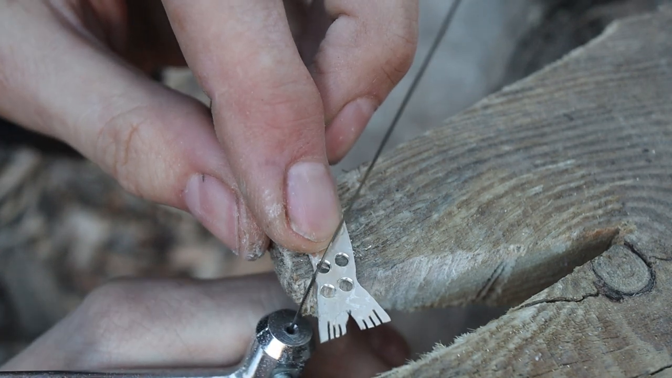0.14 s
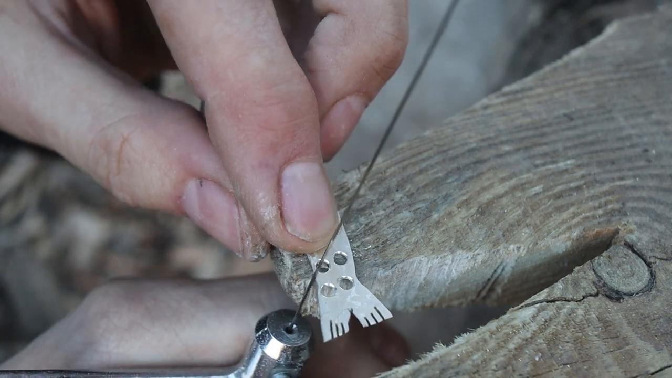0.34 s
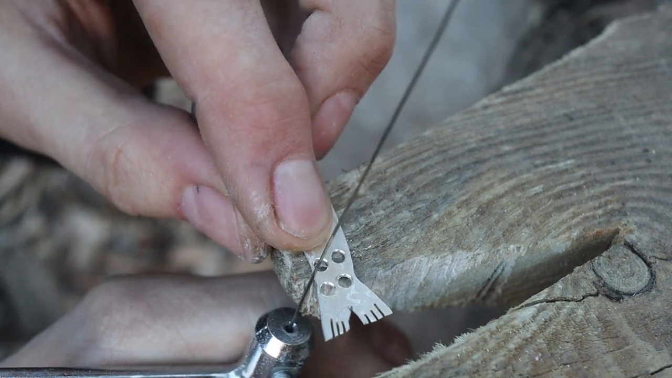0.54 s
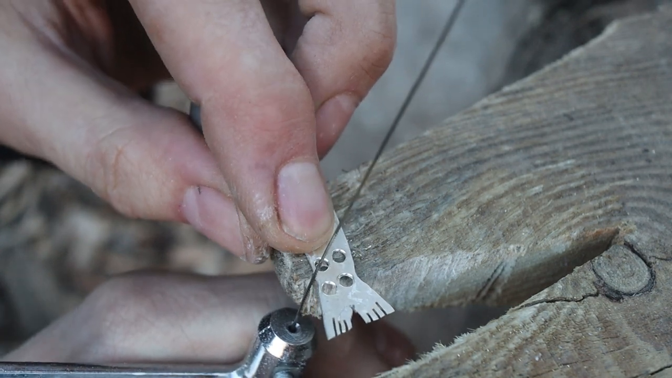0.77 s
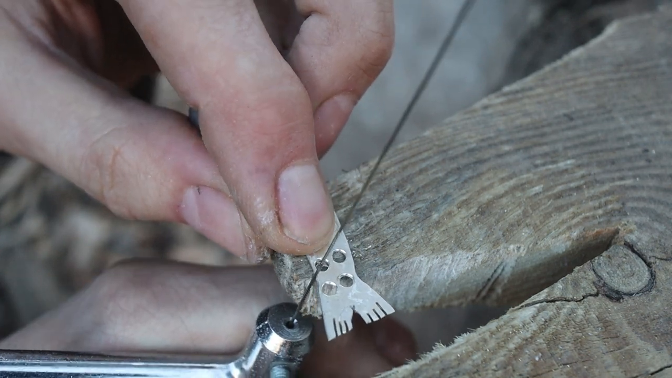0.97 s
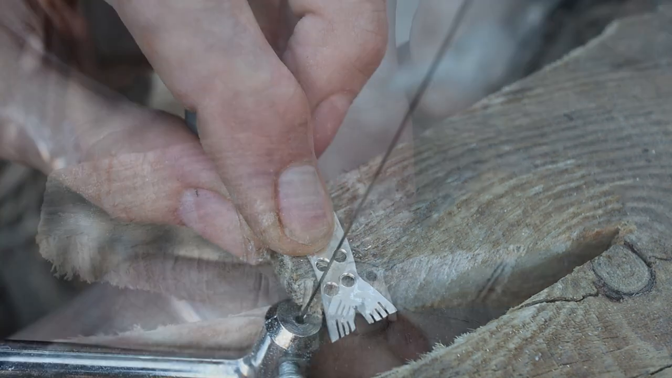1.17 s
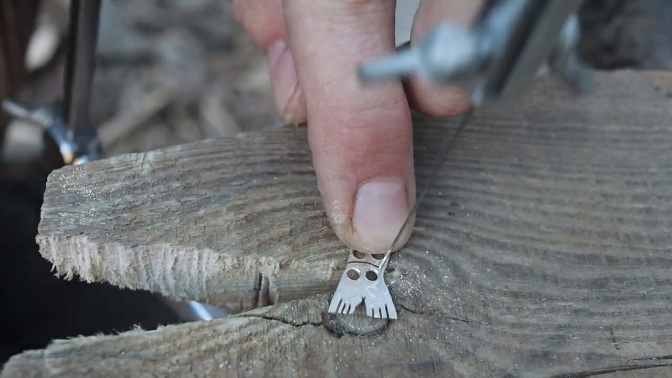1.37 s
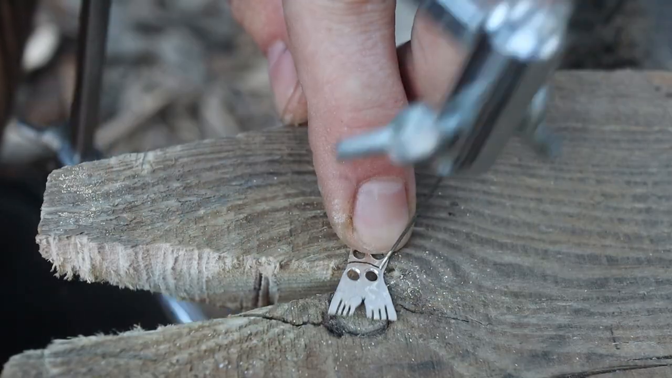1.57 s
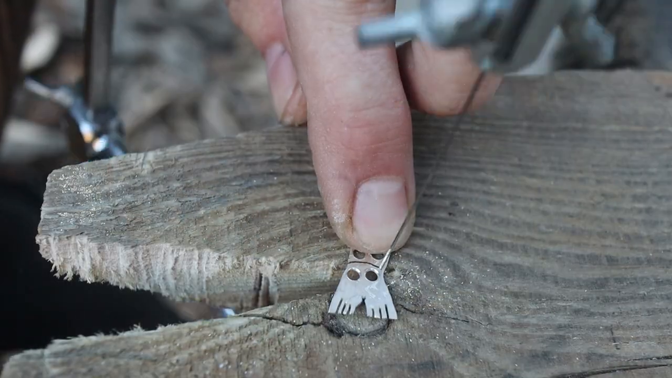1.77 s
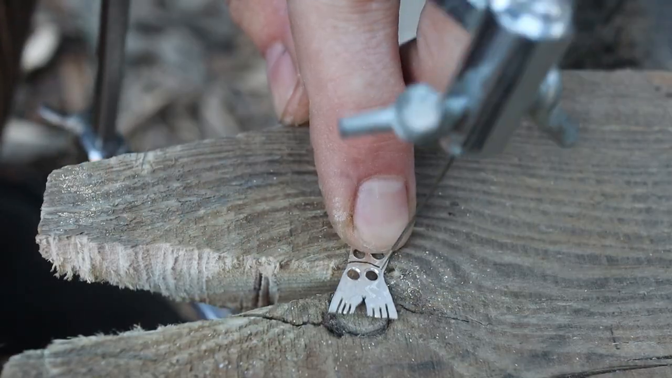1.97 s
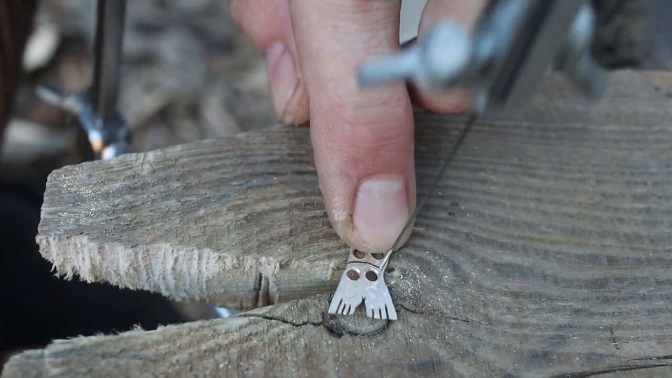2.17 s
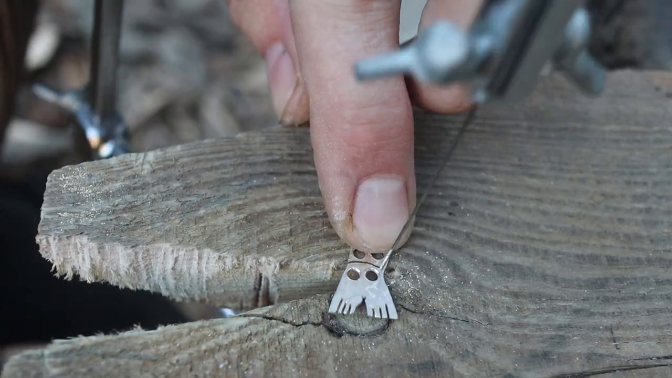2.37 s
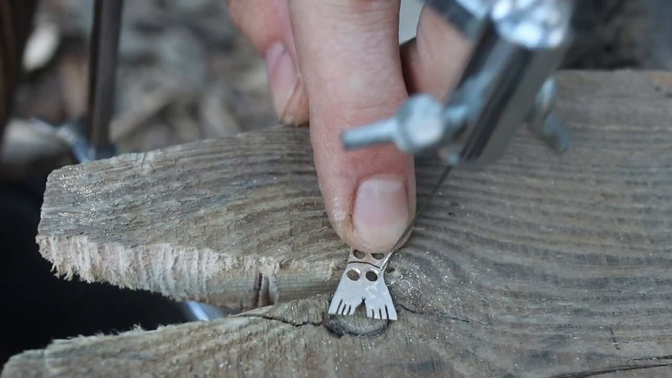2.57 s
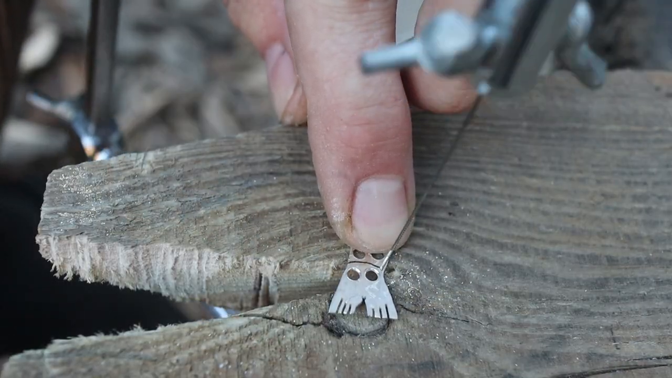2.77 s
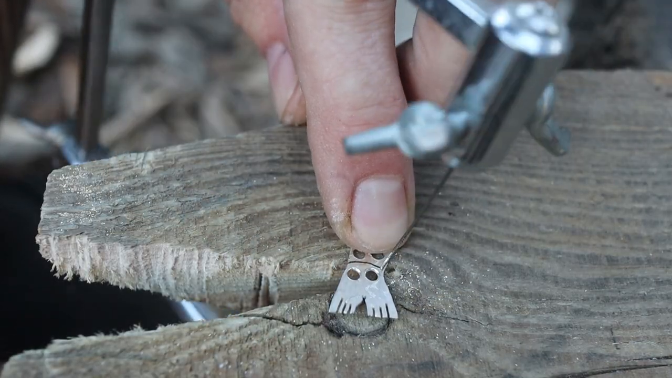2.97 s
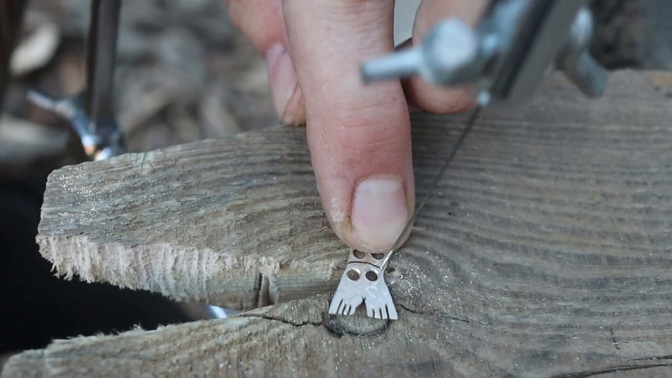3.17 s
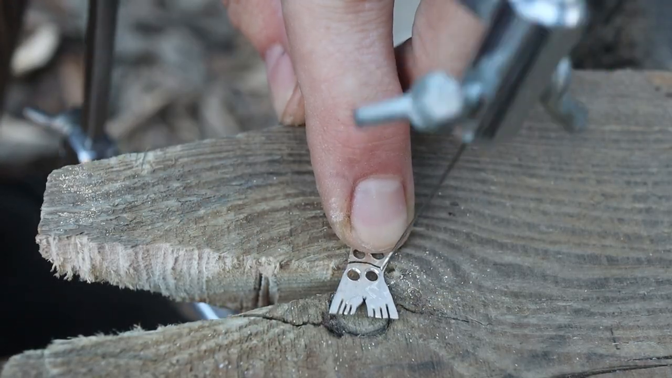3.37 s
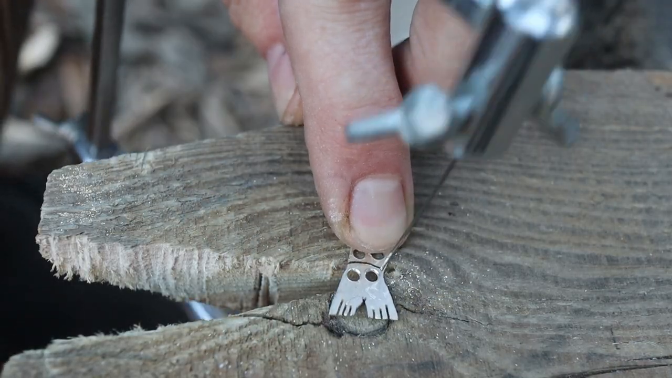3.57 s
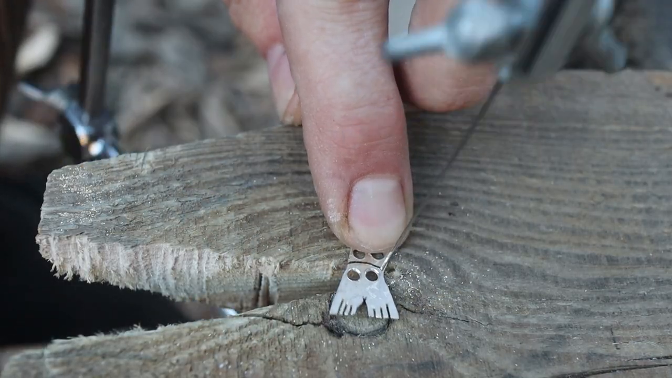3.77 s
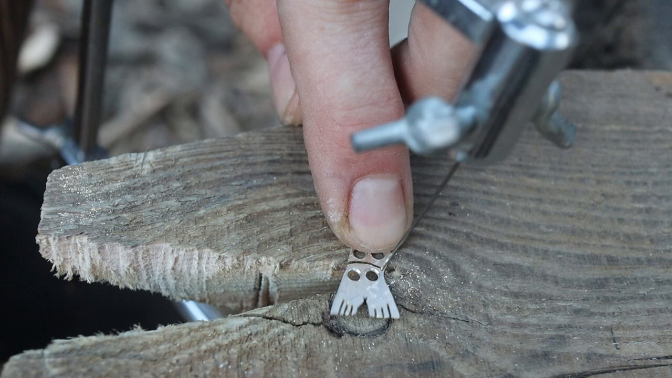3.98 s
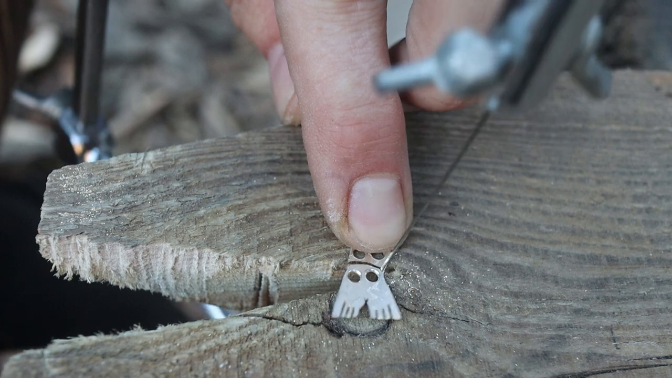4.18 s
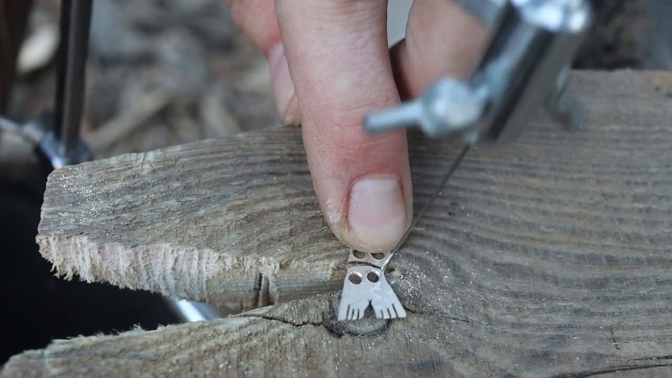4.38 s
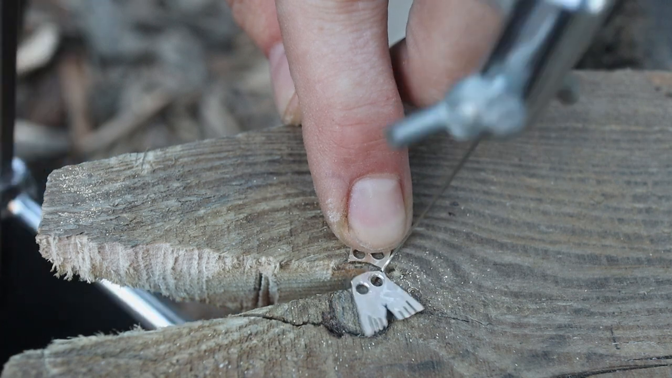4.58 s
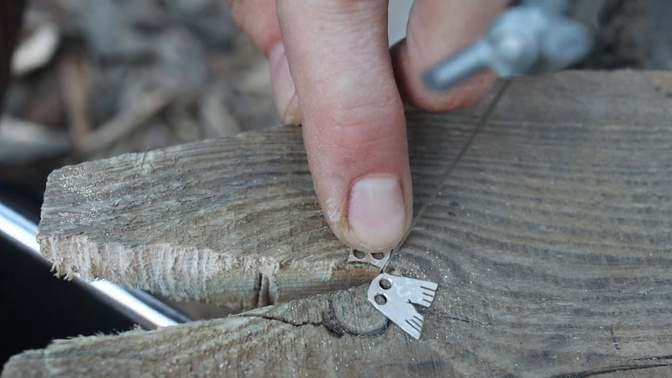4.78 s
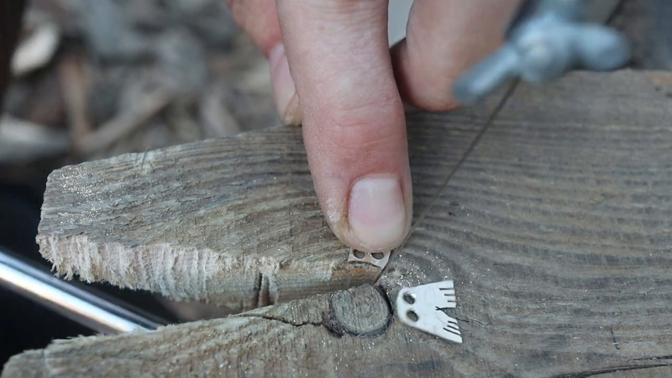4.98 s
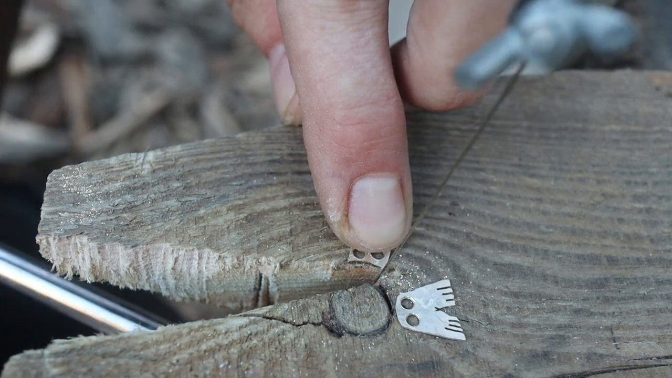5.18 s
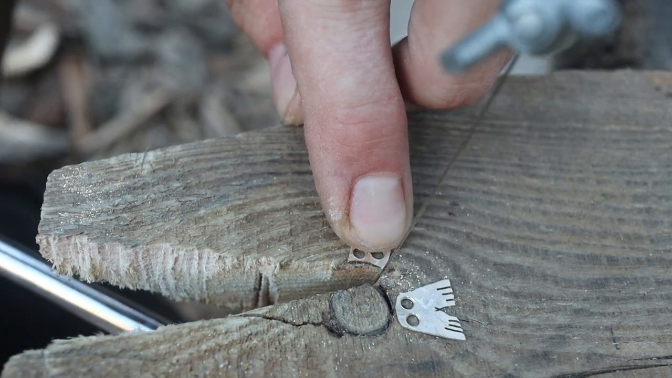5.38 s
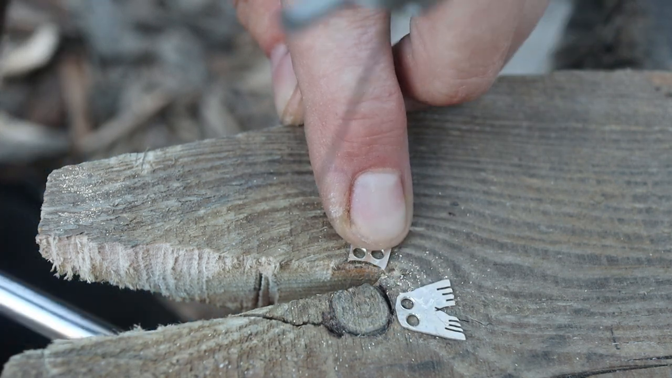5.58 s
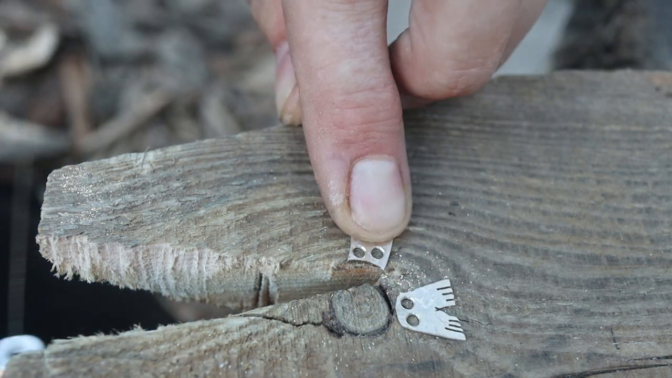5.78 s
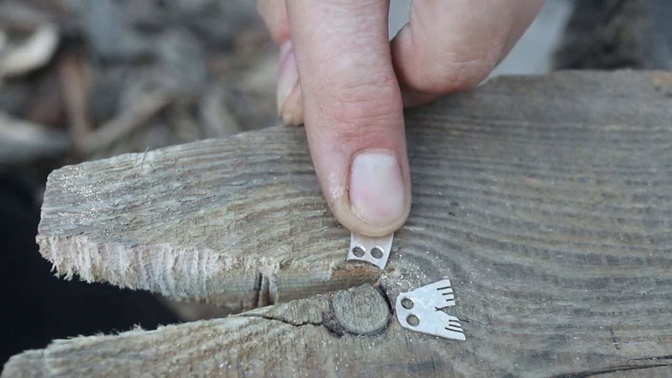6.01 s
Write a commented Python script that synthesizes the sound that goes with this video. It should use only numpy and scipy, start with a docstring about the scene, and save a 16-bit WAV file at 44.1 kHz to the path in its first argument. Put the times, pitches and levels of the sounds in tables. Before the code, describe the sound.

Outdoors, after a rattle of catches, a fine saw rasps rapidly through thin metal; a small piece snaps off tinkling and the frame clinks.

```python
"""Jeweller's saw on a bench peg

A jeweller's saw cuts thin sheet metal on a wooden bench peg, outdoors, about eight strokes a second.
Teeth tick unevenly and chips grind, exciting resonances of blade, sheet and peg; the blade snags and knocks.
The piece breaks off and tinkles, and the frame clinks as it is drawn out: taps excite decaying modes.
Behind lie shaped noise, as outdoor rumble and hiss, and a few far-off calls made of three harmonics.
"""
import sys
import numpy as np
from scipy import signal
from scipy.fft import rfft, irfft
from scipy.io import wavfile
from scipy.ndimage import uniform_filter1d, map_coordinates

SR = 44100
rng = np.random.default_rng(int(sys.argv[2]) if len(sys.argv) > 2 else 0)


def generate_wav(signal):
    """Clip the signal to [-1, 1] and save it as 16-bit WAV at the path in sys.argv[1]."""
    frames = np.transpose(np.atleast_2d(signal))
    scaled = np.clip(frames, -1, 1) * 32767
    pcm = np.round(scaled).astype(np.int16)
    wavfile.write(sys.argv[1], SR, pcm)


N = 266584
TIME = np.arange(N) / SR


def undb(db):
    """Amplitude ratio: every 20 dB is a factor of ten."""
    return 10 ** (np.asarray(db) / 20)


def rms(x):
    """Root mean square: the steady amplitude of equal power."""
    return np.sqrt(np.mean(x ** 2)) + 1e-12


def add(out, start_s, x):
    """Superposition: mix x into out from start_s, cut at the end of out."""
    i = int(start_s * SR)
    out[i:i + len(x)] += x[:len(out) - i]


def walk(rate_hz, size):
    """Band-limited randomness: smoothed random steps with a spread near 1."""
    k = max(int(SR / rate_hz), 1)
    steps = np.repeat(rng.standard_normal(size // k + 2), k)
    return uniform_filter1d(steps, k)[:size] * np.sqrt(3 / 2)


def body(peaks, base_db, base_tilt_db, low_hz, size=8192):
    """Minimum-phase resonator: peaks over a sloping base; a small object radiates little bass."""
    f = np.arange(size // 2 + 1) * SR / size + 1
    # the base bends near 3 kHz and then slopes by base_tilt_db per octave
    power = undb(base_db + base_tilt_db * np.log2(np.hypot(1, f / 3000))) ** 2
    for hz, width_hz, db in peaks:
        detuning = (f / hz - hz / f) * hz / width_hz
        power = power + undb(db) ** 2 / (1 + detuning ** 2)
    power = power / (1 + (low_hz / f) ** 8) + 1e-9
    # folding the cepstrum onto positive time makes the response causal
    cepstrum = irfft(np.log(power) / 2)
    cepstrum[1:size // 2] *= 2
    cepstrum[size // 2 + 1:] = 0
    return irfft(np.exp(rfft(cepstrum)))


PEG_TOP_HZ, HISS_FROM_HZ = 800, 4200


def voice(x, levels_db, seconds):
    """Band energy: set the peg (low), blade (middle) and hiss (top) levels over the given time."""
    bands = [(PEG_TOP_HZ, "low"), ([PEG_TOP_HZ, HISS_FROM_HZ], "band"), (HISS_FROM_HZ, "high")]
    total = 0
    for (hz, kind), db in zip(bands, levels_db):
        part = signal.sosfiltfilt(signal.butter(4, hz, kind, fs=SR, output="sos"), x)
        total = total + part * undb(db) / rms(part)
    # x may outlast the stroke: keep the energy of the stroke's own length
    return total * np.sqrt(seconds * SR / len(x))


def ring(modes):
    """Free vibration: one second of exponentially decaying modes after a tap."""
    t = TIME[:SR]
    return sum(undb(db - 60 * t / t60) * np.sin(2 * np.pi * hz * t) for hz, db, t60 in modes)


def contact(scrape_s, scrape, size=600):
    """Impulsive contact: a hard tap followed by decaying scrape noise."""
    force = scrape * rng.standard_normal(size) * np.exp(-TIME[:size] / scrape_s)
    force[0] += 1
    return force


# outdoor background spectrum, relative level per hertz: pitch_hz, level_db
AIR_SPECTRUM = [(15, -36), (25, -3.5), (70, 2.5), (120, 0.5), (242, -6), (463, -15), (796, -14.5),
                (1790, -24.5), (2000, -25), (2220, -27.5), (3820, -31.5), (4250, -30.5), (7110, -33),
                (14800, -36.5), (16000, -44)]
# levels at the start, which slowly fade
AIR_HISS_DB, AIR_RUMBLE_DB, AIR_FADE_DB_PER_S = -40.5, -40, 0.54
# the background dips while the sawing is steady
DIP_FROM_S, DIP_UNTIL_S = 1.399, 4.45
DIP_FALL_S, HISS_RECOVERY_S, RUMBLE_RECOVERY_S = 0.15, 0.033, 0.21
# initial depth, and the fraction of it lost each second
DIP_HISS_DB, DIP_RUMBLE_DB, DIP_EASE_PER_S = -17, -32.5, 0.097


def outdoors(gust_db, rumble_below_hz):
    """Spectrally shaped noise: distant hiss over an unevenly swelling rumble; both dip and return."""
    f = np.arange(N // 2 + 1) * SR / N + 1
    hz, db = np.transpose(AIR_SPECTRUM)
    spectrum = rfft(rng.standard_normal(N)) * undb(np.interp(np.log(f), np.log(hz), db))
    spectrum = spectrum / rms(irfft(spectrum, N))
    low = 1 / (1 + (f / rumble_below_hz) ** 2)
    dip = np.clip((TIME - DIP_FROM_S) / DIP_FALL_S, 0, 1)
    dip = dip * (1 - DIP_EASE_PER_S * (TIME - DIP_FROM_S))
    since = np.maximum(TIME - DIP_UNTIL_S, 0)
    hiss_db = AIR_HISS_DB + DIP_HISS_DB * dip * np.exp(-since / HISS_RECOVERY_S)
    rumble_db = AIR_RUMBLE_DB + DIP_RUMBLE_DB * dip * np.exp(-since / RUMBLE_RECOVERY_S)
    rumble = irfft(spectrum * low, N) * undb(rumble_db + gust_db * walk(12, N))
    hiss = irfft(spectrum * (1 - low), N) * undb(hiss_db)
    return (rumble + hiss) * undb(-AIR_FADE_DB_PER_S * TIME)


# resonances of the taut blade when struck: pitch_hz, width_hz, level_db
CATCH_PEAKS = [(431, 21.4, 18.5), (1170, 200, -11), (1800, 37, -9), (2140, 120, -6), (2668, 12, 6.5),
               (2690, 120, -5), (3040, 60, -2), (3395, 185, 0), (4590, 76, 2.5), (5360, 43, -3),
               (6300, 470, -1.5), (7740, 23, 4.5), (8500, 510, -7), (9330, 1200, -7.5), (12100, 110, -27)]
# single catches and knocks of the blade, levels relative, times before a common offset:
# time_s, peak_db, peg_share_db, hiss_share_db
BLADE_KNOCKS = [(0.002, -15, -16, -6), (0.093, -20, -36, -25), (0.209, -30.5, -7, -33),
                (0.232, -13, -13, -29), (1.143, -3.5, -10, -2.5), (1.156, -3.5, -8.5, -14),
                (1.171, -4, -30, -14), (1.179, -2.5, -17, -7), (1.218, -12, -10, -12.5),
                (1.407, -19.5, -15, -14), (1.43, -24, -24, 2), (4.491, -19.5, -16, -6),
                (4.736, -14, -2, -18), (4.865, -28.5, -1, -16), (4.901, -11, 0, -15),
                (4.927, -0.5, -24, -5), (5.009, -16, -5, -19), (5.021, -11, -35, -3),
                (5.123, -23.5, -15, -6), (5.144, -32, -16, -18)]


def knocks(blade_db, gain_db, offset_s, top_hz):
    """Impulse response: the blade catches or knocks, and each short tap jolts blade and peg."""
    out = np.zeros(N)
    response = body(CATCH_PEAKS, base_db=-24, base_tilt_db=-6, low_hz=340)
    response = signal.sosfilt(signal.butter(6, top_hz, fs=SR, output="sos"), response)
    for time_s, db, peg_db, hiss_db in BLADE_KNOCKS:
        jolt = signal.fftconvolve(contact(scrape_s=.003, scrape=.4), response)
        jolt = voice(jolt, (peg_db, blade_db, hiss_db), 1)
        add(out, time_s + offset_s, jolt * undb(db + gain_db) / np.abs(jolt).max())
    return out


def sawing(strokes, peaks, base_db, base_tilt_db, low_hz, tooth_hz, jitter, scatter_db, judder_hz,
           judder_db, grit, swell, hiss_swell, vary_db, detune, flex, gain_db):
    """Stick-slip excitation: each stroke speeds up and slows down; teeth tick and chips grind."""
    out = np.zeros(N)
    for start_s, end_s, fullest, *levels_db in strokes:
        n = int((end_s - start_s) * SR)
        u = np.linspace(0, 1, n)
        speed = np.abs(np.sin(np.pi * u))
        teeth = np.cumsum(tooth_hz * speed * (1 + jitter * walk(900, n))) / SR
        ticks = np.diff(np.floor(teeth), prepend=0) * undb(scatter_db * rng.standard_normal(n))
        # the hand presses hardest at the fullest moment, and the blade sticks and slips
        bend = np.log(.5) / np.log(fullest)
        push = np.abs(np.sin(np.pi * u ** bend))
        force = ticks / rms(ticks) + grit * rng.standard_normal(n)
        force = force * push ** swell * undb(judder_db * walk(judder_hz, n))
        # light contact is dull: the sharp edge of each tick comes only with pressure
        dull = signal.sosfiltfilt(signal.butter(2, HISS_FROM_HZ, fs=SR, output="sos"), force)
        force = dull + (force - dull) * push ** hiss_swell
        # the blade sits a little differently in the cut every time
        seat = rng.standard_normal((len(peaks), 2))
        seated = [(hz + detune * width_hz * a, width_hz, db + vary_db * b)
                  for (hz, width_hz, db), (a, b) in zip(peaks, seat)]
        sound = signal.fftconvolve(force, body(seated, base_db, base_tilt_db, low_hz))
        # the blade flexes, so its resonances waver
        stretch = 1 + flex * walk(37.0, len(sound))
        sound = map_coordinates(sound, [np.cumsum(stretch)], order=3)
        add(out, start_s, voice(sound, levels_db, end_s - start_s))
    return out * undb(gain_db)


# light scrapes while the blade is placed, levels relative:
# start_s, length_s, blade_db, hiss_share_db
LIGHT_SCRAPES = [(0.09, 0.089, -49.5, -24), (0.24, 0.05, -45.5, -21), (1.246, 0.079, -46, -6.5),
                 (1.309, 0.065, -51, -3.5), (1.397, 0.085, -46.5, -8.5)]
SCRAPE_PEG_DB = -1.5  # relative to the blade
# cutting strokes of the steady sawing, each followed by a lighter return:
# loudest_s, effort_db, bite_db (extra hiss as the teeth bite)
CUT_STROKES = [(1.539, -2.5, -0.5), (1.663, -0.6, 5), (1.783, -1.2, 4.5), (1.908, -0.2, 6),
               (2.033, -4.5, 6), (2.164, -0.2, 0), (2.285, 2.2, 1.5), (2.402, -1, 9.5), (2.535, -1.7, 3),
               (2.661, -1.9, 2), (2.782, -2.1, 4), (2.917, -1.5, -0.5), (3.043, -2, -1), (3.168, 0.4, -1.5),
               (3.292, 1.5, -2), (3.417, 0, -1), (3.543, -1, -5), (3.669, 0.6, -2.5), (3.795, 1.5, -0.5),
               (3.920, 1.5, -0.5), (4.049, 1.4, -1.5), (4.166, 2, -2.5), (4.289, 1.5, 6), (4.42, 1, 1)]
# relative levels at average effort, and their growth with it: peg_db, blade_db, hiss_db
CUT_LEVELS = (-45.5, -43.5, -54.5)
RETURN_LEVELS = (-53, -47.5, -59)
# growth in dB per dB of effort: peg, blade, hiss
EFFORT_GROWTH = (1.1, 0.91, 1.57)
# the return drags more as the slot deepens
DRAG_DB_PER_S = 0.2
# every cut lasts alike; the return begins as it dies away and ends with a pause before the next cut
CUT_S, OVERLAP_S, PAUSE_S = 0.058, 0.005, 0.003
# fullest moment as a fraction of the stroke
CUT_FULLEST, RETURN_FULLEST, SCRAPE_FULLEST = 0.53, 0.39, 0.2


def free_strokes():
    """Reciprocating motion: cut and return alternate with the hand's effort; light scrapes are added."""
    strokes = []
    next_starts = [loudest_s - CUT_S * CUT_FULLEST for loudest_s, _, _ in CUT_STROKES[1:]]
    next_starts.append(BINDING_STROKES[1][0])
    halfway_s = (CUT_STROKES[0][0] + CUT_STROKES[-1][0]) / 2
    for (loudest_s, effort_db, bite_db), next_start in zip(CUT_STROKES, next_starts):
        turn = loudest_s + CUT_S * (1 - CUT_FULLEST)
        effort = effort_db * np.array(EFFORT_GROWTH)
        peg_db, blade_db, hiss_db = effort + CUT_LEVELS
        strokes.append((turn - CUT_S, turn, CUT_FULLEST, peg_db, blade_db, hiss_db + bite_db))
        return_db = effort + RETURN_LEVELS + DRAG_DB_PER_S * (loudest_s - halfway_s)
        strokes.append((turn - OVERLAP_S, next_start - PAUSE_S, RETURN_FULLEST, *return_db))
    for start_s, length_s, db, hiss_db in LIGHT_SCRAPES:
        strokes.append((start_s, start_s + length_s, SCRAPE_FULLEST, db + SCRAPE_PEG_DB, db, db + hiss_db))
    return strokes


# resonances of blade, sheet and peg, running free: pitch_hz, width_hz, level_db
FREE_PEAKS = [(345, 23, -11.5), (440.4, 25.3, -0.5), (508, 40, -14), (703, 31, -12.5), (1005, 43, -12.5),
              (1297, 32, -14), (1462, 7.4, -7.5), (1644, 76, -14.5), (1967, 50, -4), (2696, 30.6, -3.5),
              (2817, 50, -5.5), (2930, 88, -4.5), (3319, 27, -2.5), (3200, 37, -6.5), (3935, 33, -10),
              (4750, 190, -18.5), (5450, 29, -18.5), (6250, 53, -21), (7000, 300, -19), (7920, 150, -25.5),
              (8590, 45, -12), (9950, 310, -26.5), (11600, 340, -34), (12600, 59, -36), (13600, 400, -32),
              (14800, 300, -47)]


def free_sawing():
    """Forced vibration: the freely running blade excites blade, sheet and peg resonances."""
    return sawing(free_strokes(), FREE_PEAKS, base_db=-23.5, base_tilt_db=-16.0, low_hz=292,
                  tooth_hz=515.4, jitter=.09, scatter_db=3.5, judder_hz=308.0, judder_db=1.0,
                  grit=1.0, swell=.8, hiss_swell=0.58, vary_db=2.5, detune=1.0, flex=0.0079,
                  gain_db=-0.71)


# far-off calls: start_s, length_s, pitch_hz, level_db
FAR_CALLS = [(0.323, 0.16, 388, -60), (.45, 0.052, 417, -51), (.51, 0.051, 402, -47),
             (0.667, 0.076, 580, -49.5), (0.865, 0.059, 498, -47), (0.911, 0.1, 527, -47)]


def far_calls(throat_hz, throat_width_hz, waver, echo_s):
    """Source and filter: short hoarse calls with one throat resonance, smeared by distance."""
    out = np.zeros(N)
    for start_s, length_s, hz, db in FAR_CALLS:
        n = int(length_s * SR)
        phase = 2 * np.pi * np.cumsum(hz * (1 + waver * walk(195, n))) / SR
        call = np.zeros(n)
        for k in range(1, 4):
            call += np.sin(k * phase) / (1 + ((k * hz - throat_hz) / throat_width_hz) ** 2)
        call = call * np.hanning(n)
        call = signal.fftconvolve(call, contact(scrape_s=echo_s, scrape=0.031, size=8000))
        add(out, start_s, call * undb(db) * np.sqrt(n / np.sum(call ** 2)))
    return out


# strokes in which the blade binds and judders, levels relative:
# start_s, length_s, fullest (fraction of the stroke), blade_db, peg_share_db, hiss_share_db
BINDING_STROKES = [(1.14, 0.072, 0.39, -25, -2, -7), (4.486, 0.13, 0.42, -26, 0, -9.5),
                   (4.615, 0.055, 0.56, -26.5, 6, -9), (4.646, 0.071, 0.55, -16, 2, -5),
                   (4.734, 0.12, 0.35, -22.5, -1, -14.5), (4.903, 0.046, 0.5, -17.5, 3, -8),
                   (4.937, 0.045, 0.25, -29.5, 14, -3.5), (5.009, 0.14, 0.24, -36, 3.5, -9)]
# resonances of blade, sheet and peg, binding: pitch_hz, width_hz, level_db
BOUND_PEAKS = [(308, 24, -16), (468.6, 21.7, 1), (505, 22, -3), (694, 25, -15.5), (1005, 13, -10.5),
               (1464, 18, -14), (1520, 860, -20), (1968, 26, -8), (2714, 69, -8), (2810, 55, -17),
               (2920, 110, -10), (3310, 36, -11.5), (3565, 20, -22), (3920, 27.4, -10), (4700, 86, -43),
               (5030, 280, -24), (5400, 150, -23), (5430, 17, -19), (6400, 200, -30.5), (6870, 400, -24.5),
               (7100, 28, -18), (8100, 300, -29), (10300, 40, -23), (11450, 500, -35), (14000, 830, -45)]


def snagging():
    """Stick-slip under load: the binding blade judders more strongly and its resonances shift."""
    strokes = [(start_s, start_s + length_s, fullest, db + peg_db, db, db + hiss_db)
               for start_s, length_s, fullest, db, peg_db, hiss_db in BINDING_STROKES]
    return sawing(strokes, BOUND_PEAKS, base_db=-40.0, base_tilt_db=-1, low_hz=278,
                  tooth_hz=986.6, jitter=.15, scatter_db=6.0, judder_hz=265.8, judder_db=2.5,
                  grit=1.0, swell=.65, hiss_swell=0.3, vary_db=3.16, detune=0.34, flex=0.0044,
                  gain_db=-4.0)


# modes of the peg and blade as the cut gives way, levels relative: pitch_hz, level_db, t60_s
PEG_MODES = [(447, -8, 0.11), (650, -27, 0.095), (1690, -20, 0.17), (2030, -18, 0.18), (2680, -29, 0.082),
             (3898, -36, 0.13), (4900, -29, 0.15)]
# the hand bumps the bench: start_s, level_db, pitch_hz
BENCH_BUMPS = [(1.224, -31, 130), (5.107, -26, 277), (5.119, -28.5, 102)]


def bench(snap_db):
    """Modal decay: the peg rings when the last bridge of metal snaps, and thuds under the hand."""
    out = np.zeros(N)
    add(out, PIECE_TINKLES[0][0], undb(snap_db) * ring(PEG_MODES))
    for start_s, db, hz in BENCH_BUMPS:
        add(out, start_s, ring([(hz, db, .07), (hz * 2.28, db, .04)]))
    return out


# the small piece is set ringing, tilt in dB per octave above 10 kHz: start_s, level_db, tilt_db
PIECE_TINKLES = [(4.931, -30.5, -39), (5.023, -29, -10)]
# ringing modes of the cut piece, levels relative: pitch_hz, level_db, t60_s
PIECE_MODES = [(5120, -18, .28), (7095, -24, .38), (10015, -5, .33), (12785, 0, .19), (14550, -4, .19)]


def piece(crack_db, crack_above_hz):
    """Modal ringing: the freed scrap cracks and rings as it snaps off, and again as it lands."""
    out = np.zeros(N)
    edge = signal.butter(2, crack_above_hz, "high", fs=SR, output="sos")
    for start_s, db, tilt_db in PIECE_TINKLES:
        modes = [(hz, level_db + tilt_db * max(np.log2(hz / 10000), 0), t60)
                 for hz, level_db, t60 in PIECE_MODES]
        add(out, start_s, undb(db) * ring(modes))
        crack = signal.sosfilt(edge, contact(scrape_s=0.0025, scrape=0.46))
        add(out, start_s, undb(db + crack_db) * crack)
    return out


# the frame touches, strikes, bounces and grazes once more, levels relative: start_s, level_db
FRAME_CLINKS = [(5.45, -11.5), (5.48, -15.5), (5.504, -7.5), (5.5135, 6.5), (5.519, 1.5), (5.5222, -6),
                (5.527, 0), (5.554, -10), (5.597, -18), (5.611, -8.5)]
# short-lived resonances of the struck blade and clamp: pitch_hz, width_hz, level_db
CLAMP_PEAKS = [(450, 32, 9), (580, 60, 0), (1035, 120, -4), (1220, 100, -1.5), (2170, 90, -3.5),
               (2660, 40, -5), (2900, 150, -5), (3540, 70, -10), (3930, 40, -5), (4510, 55, -0.5),
               (5150, 70, -3.5), (5440, 40, -10), (6900, 180, -19), (9900, 35, -22), (13500, 710, -24)]
# ringing modes of the saw frame, levels relative: pitch_hz, level_db, t60_s
FRAME_MODES = [(484, 0, .24), (641, -6, .7), (1211, -11, .8), (1459, -13, .44), (1906, -14, .73),
               (2143, -22, 1.5), (2630, -25, 1.2), (3090, -20, 1.8), (3930, -9, .2), (4183, -26, 2.0),
               (4352, -24, 1.3), (4366, -26, 1.4), (5453, -27, .7), (9890, -16, .3), (12555, -23, .55)]
FRAME_STRUCK_S = 5.5135


def clink(crash_db, ring_db):
    """Damped and free vibration: the frame chatters, the clamp rings briefly and the frame sings on."""
    out = np.zeros(N)
    clamp = body(CLAMP_PEAKS, base_db=-23, base_tilt_db=-2.5, low_hz=383)
    for start_s, db in FRAME_CLINKS:
        crash = signal.fftconvolve(contact(scrape_s=0.018, scrape=0.13), clamp)
        add(out, start_s, crash * undb(db + crash_db) / rms(crash))
    # the first hard blow sets the frame ringing
    add(out, FRAME_STRUCK_S, ring(FRAME_MODES) * undb(ring_db))
    return out


def scene():
    """Superposition: saw, knocks, clink and background add at one close microphone."""
    behind = outdoors(gust_db=1.3, rumble_below_hz=490)
    behind += far_calls(throat_hz=810, throat_width_hz=60, waver=0.037, echo_s=0.022)
    saw = free_sawing() + snagging()
    hits = knocks(blade_db=-6.5, gain_db=-5.5, offset_s=.0018, top_hz=10200)
    hits += bench(snap_db=-10.5)
    hits += piece(crack_db=8, crack_above_hz=10000)
    hits += clink(crash_db=-41.5, ring_db=-30.5)
    return (saw + hits + behind)[None]


TOP_HZ = 15900


def record(dry):
    """Clipping and band-limiting: the recorder caps the highest peaks and cuts the top."""
    capped = np.clip(dry, -.95, .95)
    return signal.sosfilt(signal.ellip(10, .2, 80, TOP_HZ, fs=SR, output="sos"), capped)


dry = scene()
out = record(dry)
generate_wav(out)
```